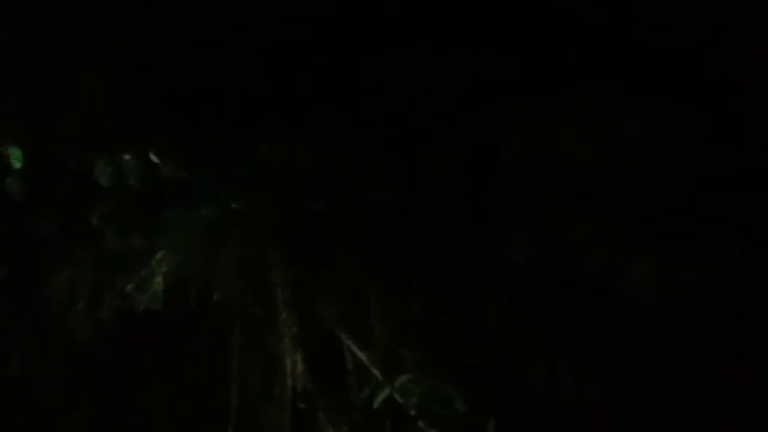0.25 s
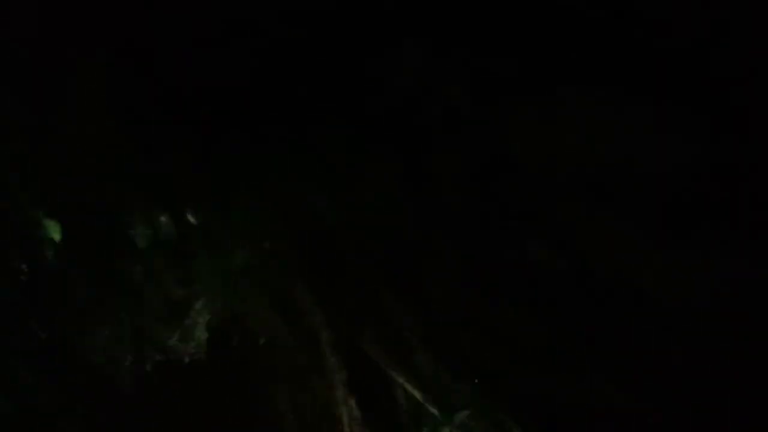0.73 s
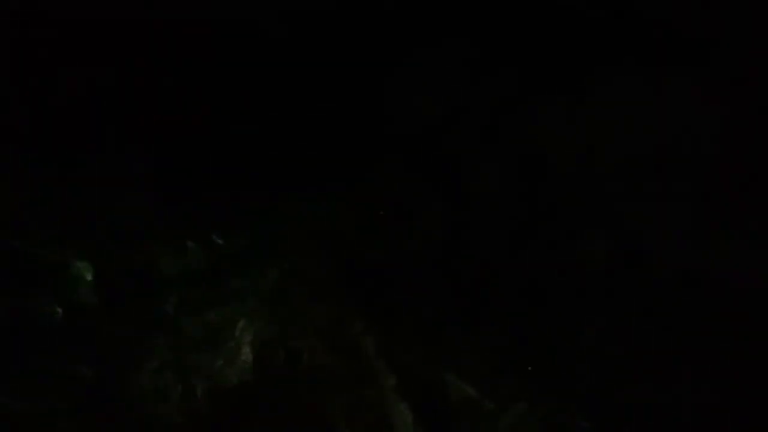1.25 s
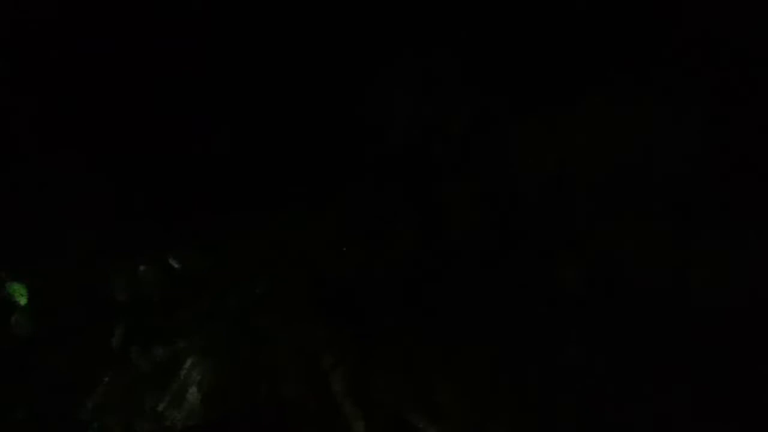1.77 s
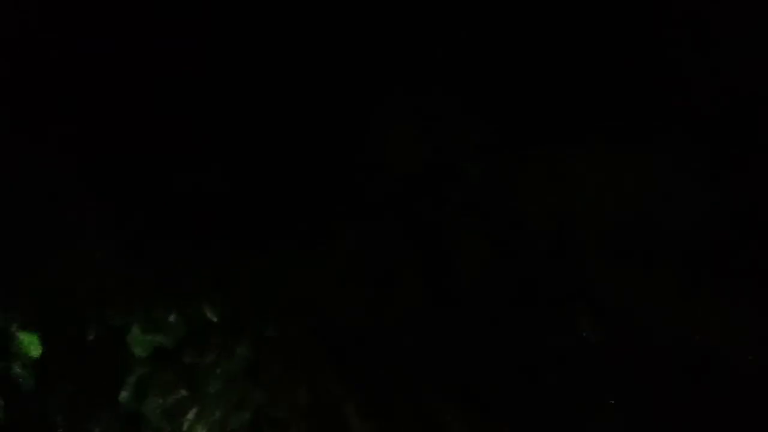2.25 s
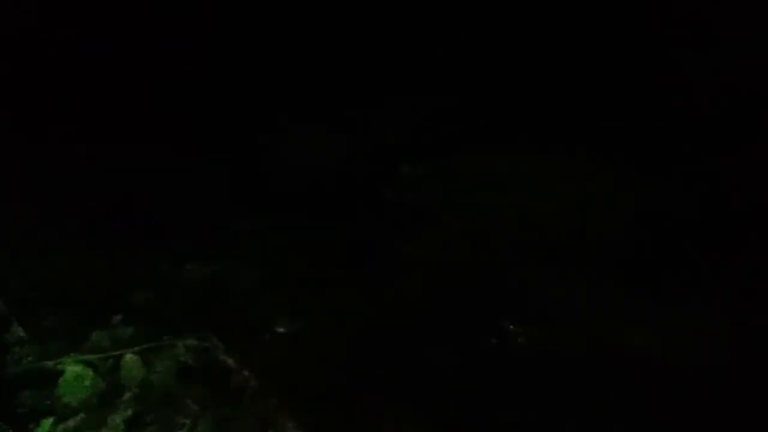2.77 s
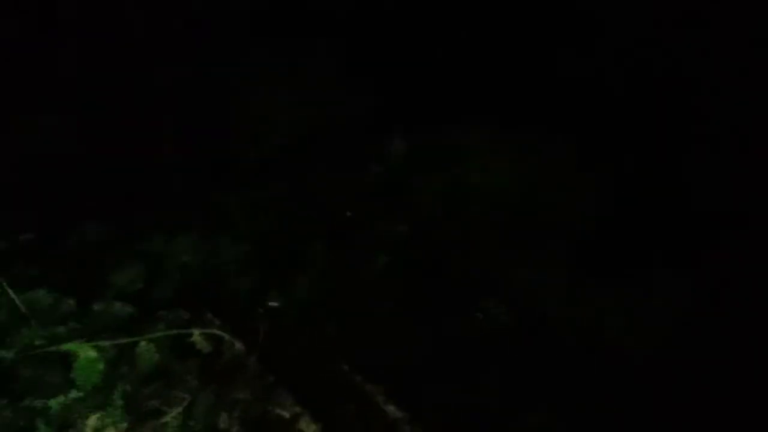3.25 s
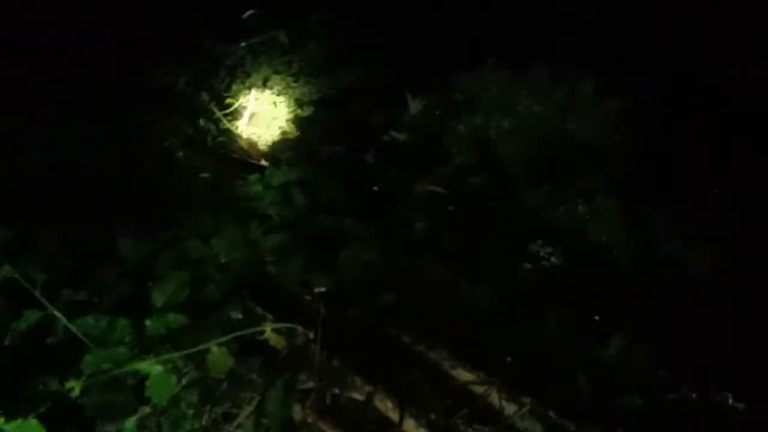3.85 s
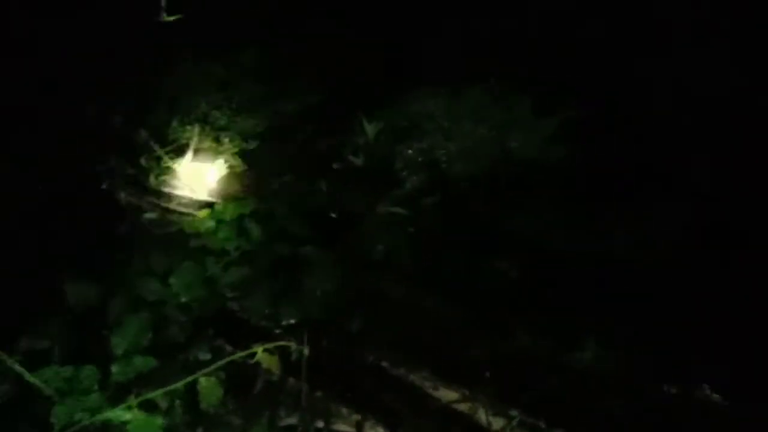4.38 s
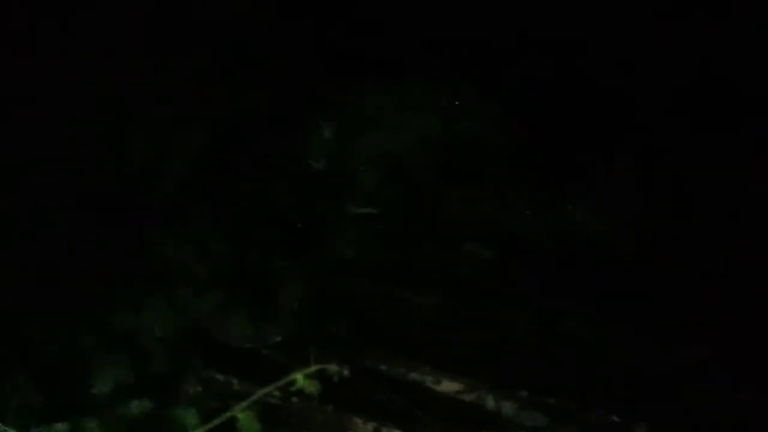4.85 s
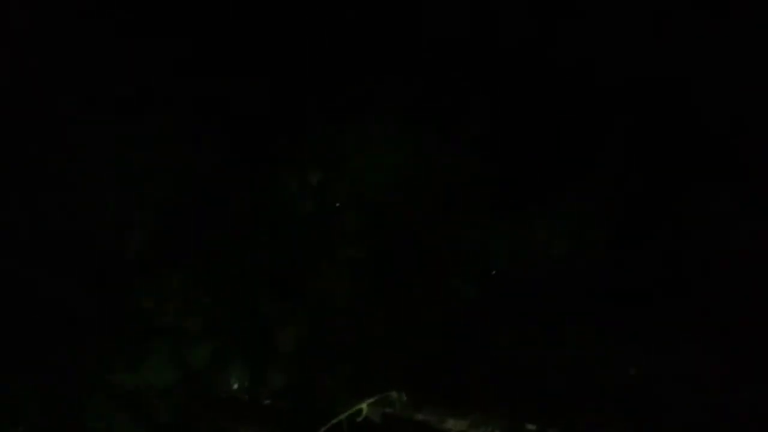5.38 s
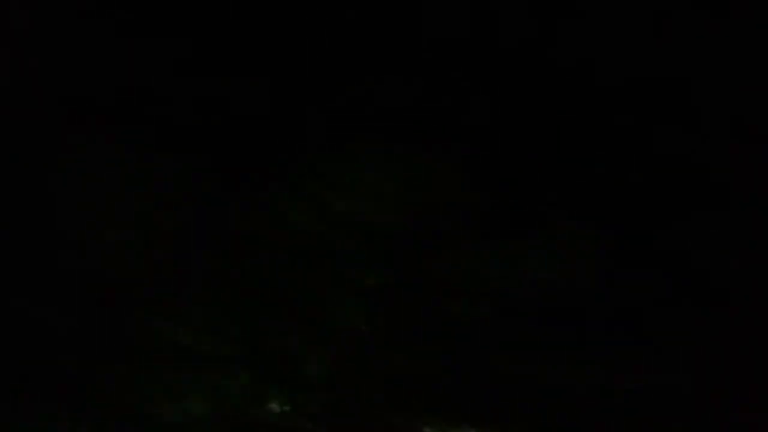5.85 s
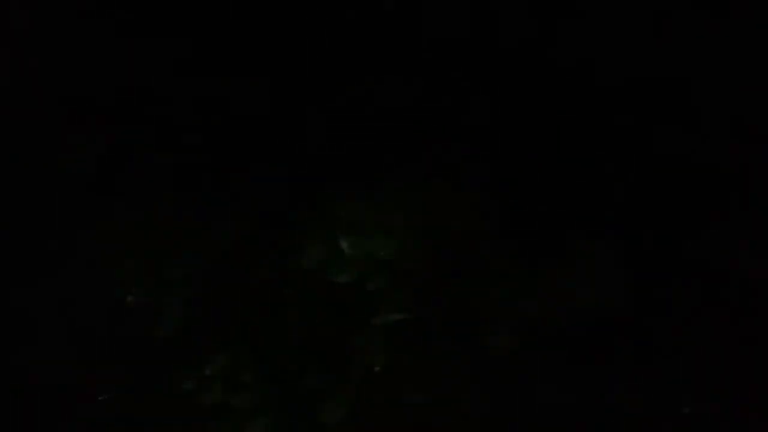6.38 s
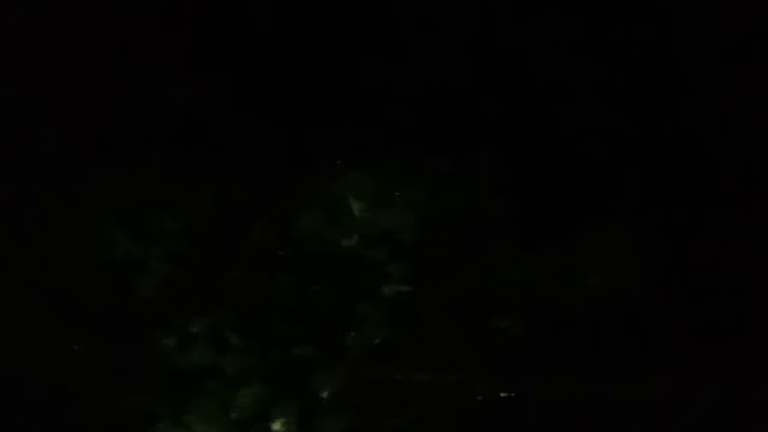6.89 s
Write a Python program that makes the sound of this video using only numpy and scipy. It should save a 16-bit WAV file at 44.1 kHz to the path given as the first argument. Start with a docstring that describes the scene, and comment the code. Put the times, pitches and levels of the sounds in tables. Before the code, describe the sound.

Night beside a flooded ditch. Crickets and katydids keep up a dense high trill over a faint low motor hum. A frog repeats a clear rising whistle about twice a second, ringing among trees, louder for the first three seconds. Close to the microphone, water is stirred through reeds in irregular bursts, with bubbles, droplets and sharp stem snaps.

```python
"""Night beside a flooded ditch, one microphone feeding both channels: crickets and katydids (clicks and noise
through resonances) sound above a distant motor's low hum throughout, and the tail of an earlier call dies first.
A frog repeats a rising whistle, a gliding sine that the trees ring back, weaker after the first three seconds.
Close by, water is stirred through reeds, most strongly near 0.7, 2.8 and 5.6 s: clicks ring as fizz and slosh,
bubbles and droplets sing as dying sines, and stems snap as bursts of noise."""
import sys
import numpy as np
from scipy import signal
from scipy.fft import rfft, irfft, next_fast_len
from scipy.io import wavfile
from scipy.ndimage import uniform_filter1d

SR = 44100
rng = np.random.default_rng(int(sys.argv[2]) if len(sys.argv) > 2 else 0)


def bounce(signal):
    """Save signal as a 16-bit WAV file at the path given by the first command-line argument."""
    frames = np.transpose(np.atleast_2d(signal))
    limited = np.clip(frames, -1, 1)
    pcm = np.round(limited * 32767).astype(np.int16)
    wavfile.write(sys.argv[1], SR, pcm)


def convert_level_to_amplitude(level_db):
    """Map a level in decibels to its linear amplitude factor."""
    exponent = np.asarray(level_db, float) / 20
    return 10 ** exponent


N = 314433   # samples


def in_time(rows):
    """Columns of a curve table, one value a sample; the first column is seconds."""
    s, *columns = np.transpose(rows)
    return [np.interp(np.arange(N) / SR, s, c) for c in columns]


def rms_one(x):
    """Scaled to rms 1."""
    return x / np.sqrt(np.mean(x ** 2) + 1e-20)


def coloured(x, spectrum):
    """Filtered to a (Hz, dB) spectrum; rms 1, so only the shape counts."""
    hz, level_db = np.transpose(spectrum)
    size = next_fast_len(N)
    bins_hz = np.maximum(np.arange(size // 2 + 1) * SR / size, 1)
    gain = convert_level_to_amplitude(np.interp(np.log(bins_hz), np.log(hz), level_db))
    return rms_one(irfft(rfft(x, size) * gain, size)[:N])


def drift(corner_hz):
    """Slow chance with spread 1: noise through two equal low-pass poles, drawn every 40 samples."""
    r = np.exp(-2 * np.pi * corner_hz * 40 / SR)
    white = rng.standard_normal(N // 40 + 2002)
    slow = signal.lfilter([1], [1, -2 * r, r * r], white)[2000:]   # settled part only
    return np.interp(np.arange(N) / 40, np.arange(len(slow)), rms_one(slow))


def resonance(x, hz, width_hz):
    """A two-pole peak with gain 1 on top."""
    r = np.exp(-np.pi * width_hz / SR)
    poles = [1, -2 * r * np.cos(2 * np.pi * hz / SR), r * r]
    return signal.lfilter([(1 - r * r) / 2, 0, (r * r - 1) / 2], poles, x)


def echoes(x, t60_s, delay_s):
    """Dense scattering: dying noise of unit energy after a gap."""
    t = np.arange(2 * SR) / SR
    tail = rng.standard_normal(len(t)) * convert_level_to_amplitude(-60 * t / t60_s) * (t > delay_s)
    return signal.fftconvolve(x, tail / np.sqrt(np.sum(tail ** 2)))[:N]


def add(out, s, sound):
    """Mixes a sound in at a time."""
    i = round(s * SR)
    out[i:i + len(sound)] += sound[:N - i]


def clicks(per_s, spread_db):
    """Random clicks of uneven size and either sign; rms 1."""
    sizes = convert_level_to_amplitude(spread_db * np.minimum(rng.exponential(1, N), 5)) * rng.choice([-1, 1], N)
    return rms_one(sizes * (rng.random(N) < per_s / SR))


def strokes(per_s, wander, corner_hz):
    """Regular wing strokes, one click each, at a slightly wandering tempo."""
    count = np.cumsum(per_s * (1 + wander * drift(corner_hz))) / SR
    return np.diff(np.floor(count), prepend=0)


def hum():
    """Low motor orders heard as narrow wavering bands over dull air noise, its level wandering."""
    # Motor bands. Each row: centre in Hz, width in Hz of each of two passes, level in relative dB.
    orders = [(100.6, 4.5, -2.5), (129.6, 23, -0.5), (188.7, 50, -11.5)]
    # Air noise. Each row: frequency in Hz, level in relative dB.
    air = [(30, -31), (60, -3.5), (100, 1), (200, -3.5), (350, -20), (800, -28), (1500, -33), (4000, -46),
           (12000, -52)]
    # Far motor and air together. Each row: time in seconds, level in dB about which it wavers.
    motor = [(0, -46), (2.6, -49), (3.1, -45), (3.9, -50), (5.2, -44.5), (7.13, -45)]
    white, lines = rng.standard_normal(N), 0
    for hz, width_hz, db in orders:
        band = resonance(resonance(white, hz, width_hz), hz, width_hz)
        lines = lines + convert_level_to_amplitude(db) * rms_one(band)
    mixed = rms_one(rms_one(lines) + convert_level_to_amplitude(-5.0) * coloured(rng.standard_normal(N), air))
    wavers_db = 1.5
    return convert_level_to_amplitude(in_time(motor)[0] + wavers_db * drift(3.5)) * mixed


def chorus():
    """Three cricket pulse trains, each at its own tempo in short phrases, merge into one band of noise."""
    # Cricket band. Each row: frequency in Hz, level in relative dB.
    band = [(5900, -37), (6150, -21), (6400, -7.5), (6800, -2.5), (7000, 1.5), (7120, 4.5), (7250, -1.5),
            (7450, -18), (7900, -52)]
    gate = 2.3   # steady part
    for per_s in rng.uniform(38, 44, 3):
        phase = 2 * np.pi * np.cumsum(per_s * (1 + 0.013 * drift(4.1))) / SR
        pulses = np.maximum(np.sin(phase), 0) ** 1.8
        gate = gate + 0.23 * pulses * convert_level_to_amplitude(7.9 * drift(3.8))
    return coloured(gate * rng.standard_normal(N), band)


def katydids():
    """Dense random wing clicks blur into a high rasp."""
    # Katydid band. Each row: frequency in Hz, level in relative dB.
    band = [(6500, -51), (7400, 2), (8300, -2.5), (9200, -2), (9700, -16), (10500, -26.5), (11500, -40),
            (13000, -56)]
    return coloured(clicks(9000, 2.1), band)


def high_hiss():
    """Sparser clicks in the top treble flicker as a hiss."""
    # Hiss band. Each row: frequency in Hz, level in relative dB.
    band = [(13200, -40), (13900, -16), (14250, 0), (14700, -5), (15200, -2), (15700, -6)]
    return convert_level_to_amplitude(-40 + 2.5 * drift(10)) * coloured(clicks(4000, 2.7), band)


def bursts(events, per_s, spectrum, length_s, noise):
    """Short swelling trains of wing clicks mixed with noise, in one colour."""
    t, gate = np.arange(0, length_s, 1 / SR), np.zeros(N)
    for s, db in events:
        add(gate, s, convert_level_to_amplitude(db) * np.sin(np.pi * t / length_s))
    train = rms_one(strokes(per_s, .003, 4))
    return gate * coloured(train + noise * rng.standard_normal(N), spectrum)


def throbbing_katydid():
    """One katydid swells at a steady interval."""
    throb_s = .29
    throbs = [(s, -13) for s in np.arange(-.01, N / SR - .1, throb_s)[1:]]
    return bursts(throbs, 110, [(7600, -40), (8000, -13), (8300, 18), (8700, -32.0)], .11, 2.8)


def buzzes():
    """One katydid buzzes alone: fast wing clicks in a high band."""
    # Lone buzzes. Each row: start in seconds, level in dB at the middle of the swell.
    events = [(1.07, -44), (1.92, -50), (2.88, -54), (3.76, -52), (4.56, -50), (5.55, -48), (6.38, -52)]
    spectrum = [(8500, -41), (9500, 4), (10200, 6), (11200, -6), (12000, -35)]
    return bursts(events, 335, spectrum, .12, 0.27)


def chirps():
    """A lower cricket chirps: slower wing clicks with much noise."""
    # Lone chirps. Each row: start in seconds, level in dB at the middle of the swell.
    events = [(.36, -50), (.6, -50), (.9, -44), (1.17, -43), (1.33, -50), (3.2, -45), (3.68, -55),
              (4.68, -48), (4.96, -45.5), (5.25, -46)]
    spectrum = [(5200, -37), (5700, 6), (6000, 3), (6400, -15), (7000, -35)]
    return bursts(events, 170, spectrum, 0.12, .8)


def trill():
    """Steady wing strokes ring one resonance; a slightly wandering tempo and echoes make each line fade alone."""
    colour = [(4250, -60), (4450, -22), (4610, -5), (4830, -3), (4940, 0),
              (5150, -8), (5260, -12), (5450, -26), (5700, -60)]   # (Hz, relative dB)
    wing = coloured(strokes(107.4, .0025, 2.5), colour)
    breath = convert_level_to_amplitude(-18) * coloured(rng.standard_normal(N), colour)
    return rms_one(0.27 * wing + echoes(wing, 0.69, 0.0052) + breath)


def insects():
    """Crickets and katydids; the chorus and the trill sink after the loud snaps near 2.8 and 3.45 s, then
    slowly recover."""
    # Each row: time in seconds, chorus level in dB, trilling cricket level in dB, both before a fixed lift.
    night = [(0.0, -28.5, -38), (0.46, -28, -36), (1.27, -28, -39), (1.67, -29, -38), (2.56, -27, -34.5),
             (2.9, -30, -39), (3.79, -35, -44), (4.29, -33, -40), (4.98, -34, -43), (5.64, -30, -39),
             (6.02, -31, -41), (6.45, -32, -38), (7.13, -29, -41)]
    chorus_db, trill_db = in_time(night)
    lift_db = .3
    band = chorus() + convert_level_to_amplitude(-10.0) * katydids() + high_hiss() + throbbing_katydid()
    return convert_level_to_amplitude(chorus_db + lift_db) * band + convert_level_to_amplitude(trill_db + lift_db) * trill() + buzzes() + chirps()


def surges():
    """Gains of fizz, slosh and rustle: each surge rises fast, holds and drains away."""
    # Surges of water through the reeds. Each row: start of the hold in seconds, hold in seconds,
    # fizz level in dB, slosh level in dB, leaf rustle level in dB.
    stir = [(0.082, 0.021, -36.5, -47.5, -41), (0.195, 0.14, -43, -53.5, -60),
            (0.38, 0.027, -32, -44.5, -42), (0.464, .1, -41, -56, -60), (0.695, 0.03, -35, -53, -30),
            (0.741, .045, -32.5, -35, -34), (1.14, .06, -40, -54, -63), (1.24, .07, -47, -50, -68),
            (1.35, 0.012, -35.5, -50, -57), (1.498, 0.052, -44.5, -51, -65), (1.789, 0.011, -37, -50, -70),
            (2.574, 0.0086, -43, -58, -66), (2.687, 0.06, -35, -60, -46), (2.791, 0.036, -24, -36.5, -29.5),
            (2.87, 0.086, -40, -42.5, -42), (3.02, 0.043, -35, -49, -54), (3.1, .07, -45, -52, -62),
            (3.22, .06, -37, -54, -58), (3.31, .1, -43, -54, -64), (3.445, .03, -33, -56, -61),
            (3.56, .1, -42, -48, -66), (3.677, 0.033, -41, -50, -56), (4.314, 0.045, -44, -74, -72),
            (4.418, .11, -37, -51, -61), (5.615, .05, -33, -49, -48), (5.7, .14, -35, -50, -50),
            (5.864, .085, -35, -65, -47), (6.19, .09, -43, -58, -73), (6.355, 0.064, -42.5, -52.5, -70),
            (6.505, 0.088, -49, -63, -65), (6.67, 0.077, -52.5, -49.5, -74), (7.02, .06, -54, -47, -76)]
    # Levels between surges: fizz in dB, slosh in dB, leaf rustle in dB.
    still_db = [-70, -64, -72]
    rise_db_per_s, fall_db_per_s = 1100, 280
    t, gains = np.arange(N // 32 + 2) * 32 / SR, 0   # every 32 samples
    for s, hold_s, *levels_db in stir:
        before_db = rise_db_per_s * np.maximum(s - t, 0)
        after_db = fall_db_per_s * np.maximum(t - s - hold_s, 0)
        gains = gains + convert_level_to_amplitude(np.subtract.outer(levels_db, before_db + after_db))
    return [convert_level_to_amplitude(db) + np.interp(np.arange(N) / SR, t, g) for db, g in zip(still_db, gains)]


def grains(low_hz, high_hz, per_s, cycles, spread_db, wash_db):
    """Clicks dealt to resonators spread in pitch, each ringing a few cycles over its own flickering wash."""
    born, dealt = clicks(per_s, spread_db), rng.integers(0, 12, N)
    white, out = rng.standard_normal(N), 0
    for k, hz in enumerate(np.geomspace(low_hz, high_hz, num=12)):
        wash = convert_level_to_amplitude(wash_db + 6.8 * drift(15)) * np.roll(white, 997 * k)
        ring = resonance(born * (dealt == k) + wash, hz, hz / cycles)
        out = out + resonance(ring, hz, hz / 5.0) / np.sqrt(hz)
    return rms_one(out)


def water(fizz_gain, slosh_gain, rustle_gain):
    """Tiny bubbles fizz, larger ones slosh, dry leaves crackle in the treble."""
    fizz = grains(1350, 4150, 750, 8.7, 5.7, -12)
    slosh = grains(345.5, 1028, 200, 7.1, 2.77, -19)
    leaves = [(3000, -27), (6000, -1.5), (10000, -13), (13000, -20.5), (15000, -9.0)]   # (Hz, relative dB)
    rustle = coloured(clicks(9000 * convert_level_to_amplitude(1.5 * drift(34)), 3.5), leaves)
    return fizz_gain * fizz + slosh_gain * slosh + rustle_gain * rustle


def plop(db, hz, t60_s, rise):
    """A bubble rings as a dying sine that climbs while it nears the surface, or sinks if rise is negative."""
    t = np.arange(0, np.clip(t60_s, .004, .3), 1 / SR)
    envelope = convert_level_to_amplitude(db - 60 * t / t60_s) * (1 - np.exp(-t * hz * 2.7))
    return envelope * np.sin(2 * np.pi * hz * (t + rise * t * t / (2 * t60_s)))


def bubbles():
    """Large bubbles sing, longer the more their pitch moves."""
    # Each row: start in seconds, level in dB before decay, starting pitch in Hz,
    # rise as a share of that pitch per t60.
    rows = [(.300, -23, 1220, 0.3), (.729, -27, 450, 1.8), (.739, -26, 1260, -1), (1.246, -28, 1280, .03),
            (1.356, -27.5, 450, 0.5), (1.484, -28.5, 1360, 0.7), (1.508, -24, 830, .57),
            (1.537, -23.5, 1197, 0), (1.966, -26.5, 508, 4), (2.031, -25.5, 1216, 0.34),
            (2.722, -14.5, 797, 0.9), (2.776, -9, 1240, .05), (2.793, -16, 690, .05),
            (2.819, -27, 570, -.9), (2.961, -26, 509, 1.4), (3.029, -21, 1420, 0.9), (3.597, -27, 598, .3),
            (3.705, -28, 790, .05), (3.721, -24, 1033, .05), (3.751, -28, 1206, .5),
            (3.799, -32.5, 1470, -0.4), (4.507, -16, 913, 0.45), (5.565, -23, 1305, -0.1),
            (5.586, -21.5, 694, -0.7), (5.613, -22.5, 746, 1.5), (5.632, -16, 668, 0.9),
            (5.633, -10, 1222, 0.1), (5.704, -33, 373, 3.2), (5.863, -11.5, 888, 0.3),
            (5.899, -22.5, 1210, 1), (6.378, -33, 440, 0.5), (6.415, -20, 1236, .21),
            (6.451, -28, 1310, .5), (6.660, -29, 580, 2.6), (6.693, -25, 1250, .6), (6.823, -33, 450, 2)]
    out = np.zeros(N)
    for s, db, hz, rise in rows:
        t60_s = .038 + 0.045 * max(rise, 0) + .2 * max(-rise, 0)
        add(out, s, plop(db, hz, t60_s, rise))
    return out


def droplets():
    """A droplet ticks as a short noise and rings a few cycles."""
    # Each row: start in seconds, level in dB from which ring and tick are set, ring pitch in Hz.
    rows = [(0.4671, -11.5, 3620), (0.6847, -12.5, 2250), (0.7367, -16, 1770), (0.764, -13, 1725),
            (0.795, -11, 1730), (1.1455, -21, 2920), (1.245, -27, 2100), (1.2984, -24, 1930),
            (1.3524, -17, 3080), (1.781, -22, 2800), (2.7713, -23, 1930), (2.802, -12, 3000),
            (2.918, -24, 2230), (3.0026, -22, 3320), (3.3903, -22, 3240), (3.4454, -10.5, 2230),
            (3.597, -28, 2600), (3.6253, -23.5, 2660), (3.527, -32, 2200), (3.571, -30, 3400),
            (3.688, -30, 1700), (3.707, -26, 1900), (4.2808, -18.5, 1980), (4.325, -25, 3350),
            (4.346, -21.5, 2580), (4.3748, -20.5, 2530), (4.485, -16, 2750), (5.6185, -6.5, 2210),
            (5.702, -14, 2100), (5.7552, -16.5, 3080), (5.7924, -28, 2620), (5.8137, -20.5, 2130),
            (5.8654, -20, 1530), (5.914, -27, 1630), (5.9489, -16, 3000), (6.1883, -23, 2860),
            (6.203, -18.5, 3380), (6.2672, -22, 2100), (6.315, -26.5, 2360), (6.3795, -22, 2130),
            (6.537, -33, 2340), (6.562, -33, 2900), (6.772, -36, 3500), (7.016, -38, 3000)]
    out, t = np.zeros(N), np.arange(0, .05, 1 / SR)
    for s, db, hz in rows:
        noise = rng.standard_normal(len(t))
        tick = resonance(noise * convert_level_to_amplitude(-60 * t / 0.012), 0.88 * hz, 0.47 * hz)
        add(out, s, plop(db - 3.5, hz, 36 / hz, 0.44))
        add(out, s, convert_level_to_amplitude(db + 5.0) * resonance(tick, 1.2 * hz, 1.6 * hz))
    return out


def slaps():
    """Water slapped or gulped: a dull broad puff of noise over a very short ring."""
    # Each row: start in seconds, ring level in dB before decay (sets the puff too), ring pitch in Hz.
    rows = [(0.751, -35, 460), (1.802, -26, 215), (2.7, -22, 690), (2.761, -22, 573), (3.464, -28, 616),
            (3.597, -29, 595), (3.704, -24, 710), (4.445, -12, 600), (3.65, -34, 330), (4.524, -27, 400),
            (6.399, -36, 360), (6.663, -22.5, 424)]
    out, t = np.zeros(N), np.arange(0, .05, 1 / SR)
    for s, db, hz in rows:
        noise = rng.standard_normal(len(t))
        puff = resonance(noise * convert_level_to_amplitude(-60 * t / 0.028), hz, 0.65 * hz)
        add(out, s, plop(db, hz, 14 / hz, 0.39))
        add(out, s, convert_level_to_amplitude(db + 19) * resonance(puff, 1.73 * hz, 0.76 * hz))
    return out


def splashes():
    """Bubbles, droplets and slaps with a short dense echo."""
    out = bubbles() + droplets() + slaps()
    return out + convert_level_to_amplitude(-5.5) * echoes(out, 0.07, 0.0017)


def snaps():
    """A stem snaps: a broad crack coloured by the stem, then fibres crackle away."""
    # Each row: start in seconds, peak in dB, crack frequency in Hz, t60 in seconds of the crackle.
    rows = [(0.684, -8.5, 12300, 0.067), (.771, -22, 14000, .03), (0.789, -5.5, 7100, 0.11),
            (2.469, -22, 10800, 0.026), (2.587, -33, 12000, 0.033), (2.800, -.8, 4900, 0.063),
            (2.801, -15, 13500, .09), (2.889, -16, 6500, 0.033), (3.451, -3, 4200, 0.05),
            (4.522, -7.5, 3600, 0.06), (5.621, -32, 4000, 0.036), (5.755, -20, 13000, 0.05),
            (5.938, -19, 12100, 0.074), (6.535, -28, 12000, 0.018)]
    out, t = np.zeros(N), np.arange(0, .12, 1 / SR)
    for s, db, hz, t60_s in rows:
        noise = rng.standard_normal(len(t))
        crackle = convert_level_to_amplitude(-15 - 60 * t / max(t60_s, .005)) * np.abs(noise[::-1])
        crack = noise * (convert_level_to_amplitude(-60 * t / 0.0044) + crackle)
        crack = resonance(resonance(crack, hz, .6 * hz), hz, 1.5 * hz) + 0.02 * crack
        add(out, s, convert_level_to_amplitude(db) * crack / np.max(np.abs(crack)))
    return out


def far_frogs():
    """Far frogs melt into a thin drone; the tail of an earlier call dies away at the start."""
    white = rng.standard_normal(N)
    drone = rms_one(resonance(resonance(white, 1145, 60), 1150, 75))
    earlier = rms_one(resonance(resonance(white[::-1], 1130, 190), 990, 320))
    return convert_level_to_amplitude(-47) * drone + convert_level_to_amplitude(-37.5 - 14 * np.arange(N) / SR) * earlier


def frog():
    """A near sine holds a low note, climbs, swells at the top and droops; the trees ring on after it."""
    # Each row: top of the call in seconds, peak level in dB, first note level in dB (both before flutter),
    # first note in Hz, end in Hz.
    calls = [(0.356, -13, -23, 747, 1010), (0.831, -14, -26, 794, 1017), (1.311, -15, -30, 730, 985),
             (1.772, -14, -27, 765, 1030), (2.232, -14, -24.5, 783, 1058), (2.689, -15, -24, 793, 1093),
             (3.126, -21, -26.5, 819, 1030), (3.579, -23.5, -30, 800, 1100),
             (4.019, -24.5, -27.5, 826, 1080), (4.467, -25, -30, 818, 1050), (4.917, -24, -29, 802, 1060),
             (5.366, -24, -28, 800, 1070), (5.813, -25, -27, 819, 1050), (6.263, -24, -27, 803, 1030),
             (6.714, -24.5, -27, 828, 1010), (7.152, -21.5, -26.5, 834, 1100)]
    top_hz, attack_s, lead_s, lead_s_per_db = 1155, .012, .086, .0013
    climb_from_s, climb_to_s, climb_db = .054, .012, -4   # before the top; level dips on the way up
    swell_s, droop_s, release_s = .024, .033, .009
    t, out = np.arange(-.1, .06, 1 / SR), np.zeros(N)   # 0 at the top of the call
    climb = np.clip((t + climb_from_s) / (climb_from_s - climb_to_s), 0, 1)
    fall = np.clip(t / droop_s, 0, 1) ** 1.13
    swell = np.exp(-np.abs(t / swell_s) ** 3.0) * np.clip((droop_s + release_s - t) / release_s, 0, 1)
    smooth_climb = uniform_filter1d(climb, size=441)
    for top_s, db, first_db, low_hz, end_hz in calls:
        hz = low_hz + smooth_climb * (top_hz - low_hz) + fall * (end_hz - top_hz)
        # the call starts earlier the nearer its first note comes to the peak level
        attack = np.clip((t + lead_s + lead_s_per_db * (first_db - db)) / attack_s, 0, 1)
        first_note = convert_level_to_amplitude(first_db + climb_db * climb) * attack * np.clip(-t / climb_to_s, 0, 1)
        envelope = first_note + convert_level_to_amplitude(db) * swell
        add(out, top_s + t[0], envelope * np.sin(2 * np.pi * np.cumsum(hz) / SR))
    flutter_db = 2.01
    out = out * convert_level_to_amplitude(flutter_db * drift(30))   # the level flutters within each call
    near = convert_level_to_amplitude(-9.5) * echoes(out, 0.34, .008)
    trees = convert_level_to_amplitude(-11.5) * echoes(out, 0.69, 0.044)
    return out + near + trees


def scene():
    """All sources at one microphone; the channels differ only by a faint low noise."""
    mid = hum() + insects() + water(*surges()) + splashes() + snaps() + far_frogs() + frog()
    low_noise = [(30, -5), (100, -7.0), (500, -6.0), (3000, -9.5), (5000, -21)]   # (Hz, relative dB)
    side = convert_level_to_amplitude(-65.5) * coloured(rng.standard_normal(N), low_noise)
    return np.array([mid + side, mid - side])


def band_limit(x):
    """A steep low-pass at the top of the band."""
    return signal.sosfilt(signal.butter(12, 16630, fs=SR, output="sos"), x)


def record(dry):
    """The microphone peaks in the high treble, the converter tops out at full scale, the extreme treble is cut."""
    peak_hz, peak_width_hz, peak_db, cutoff_hz = 15000, 1200, 6, 15800
    heard = dry + convert_level_to_amplitude(peak_db) * resonance(dry, peak_hz, peak_width_hz)
    low_pass = signal.cheby2(14, 45, cutoff_hz, fs=SR, output="sos")
    mix = signal.sosfilt(low_pass, np.clip(heard, -1, 1))
    return band_limit(mix)


dry = scene()
out = record(dry)
bounce(out)
```